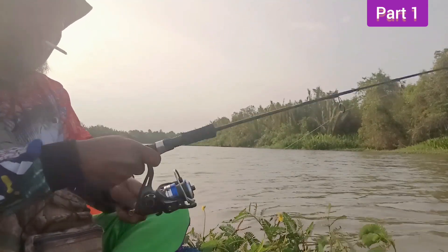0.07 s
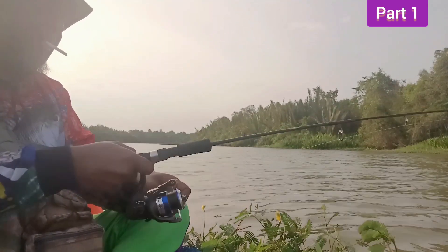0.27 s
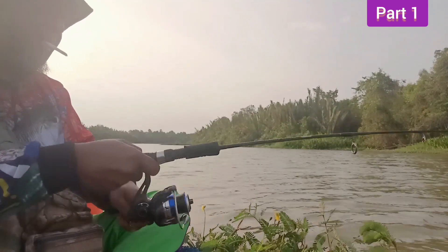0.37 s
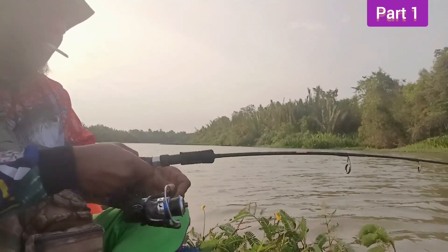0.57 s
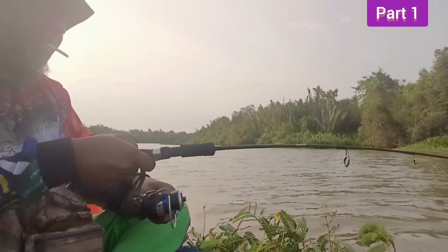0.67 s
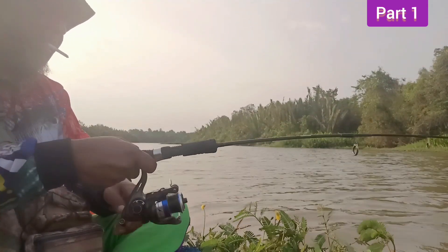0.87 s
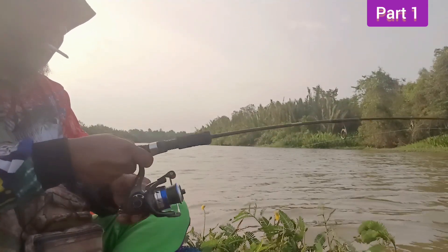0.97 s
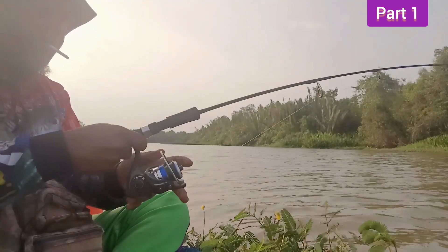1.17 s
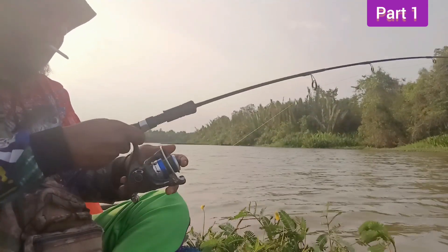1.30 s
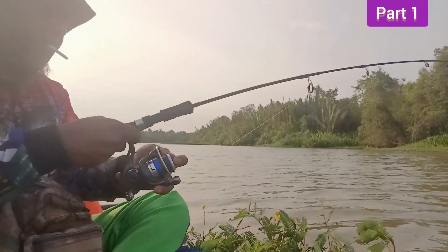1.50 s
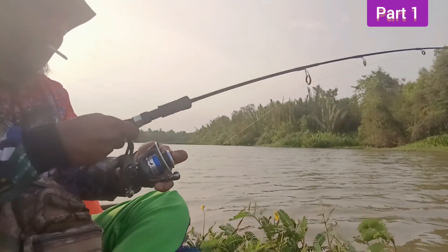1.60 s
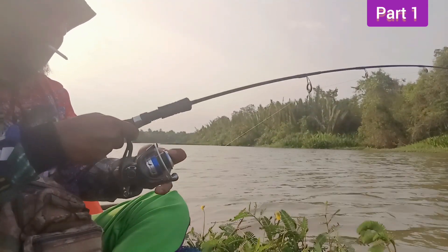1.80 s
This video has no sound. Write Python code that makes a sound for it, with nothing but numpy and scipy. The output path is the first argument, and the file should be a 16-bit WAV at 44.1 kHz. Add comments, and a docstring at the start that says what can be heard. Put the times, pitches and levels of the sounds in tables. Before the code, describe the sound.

A fishing reel's drag clicks rapidly with a bright metallic ring, over light wind.

```python
"""Spinning reel on a river bank

The rod dips and line is pulled off against the drag. The pawl ticks over its teeth, faster and
then slower, and sets the metal spool ringing. Later the reel gives a few dry ticks and the taut
line slips once. Wind buffets the two microphone ports, water laps at the bank, and air hisses."""
import sys
import numpy as np
from scipy import signal
from scipy.fft import rfft, irfft, next_fast_len
from scipy.io import wavfile
from scipy.ndimage import uniform_filter1d

SR = 44100
rng = np.random.default_rng(int(sys.argv[2]) if len(sys.argv) > 2 else 0)


def dump_mix(stems):
    """Bounce the given channels to the path in sys.argv[1] as a 16-bit WAV at rate SR."""
    frames = np.atleast_2d(stems).T  # one column per channel
    limited = np.clip(frames, -1, 1)  # hard clip at full scale
    pcm = np.round(limited * 32767).astype(np.int16)
    wavfile.write(sys.argv[1], SR, pcm)


N = 81585
T = np.arange(N) / SR

# Hiss of air over the river at each port. Each row: frequency in Hz, relative level in dB.
AIR_EQ_LEFT = [(300, 4.5), (600, -2), (1000, -8.5), (1900, 1), (3000, -9.5), (5000, -18), (7000, -27),
               (10200, -10.5), (12600, -23.5)]
AIR_EQ_RIGHT = [(300, 0), (600, -3.5), (1000, -7.5), (1900, 0.5), (3000, -8.5), (6900, -6), (8500, -16),
                (11000, -35.5), (13000, -15.5)]
# Puffs of wind. Each row: centre in seconds, strength in dB, half width in seconds,
# lean to the left in dB.
WIND_PUFFS = [(0.076, -32.5, 0.012, -20), (0.165, -29.5, 0.0086, 35), (0.23, -25, 0.016, 19),
              (0.316, -32.5, 0.043, -2.5), (0.483, -25.5, 0.026, -4.5), (0.532, -17, 0.0075, -7.5),
              (0.592, -15.5, 0.014, 5.5), (0.638, -20, 0.028, 0), (0.723, -26.5, 0.016, 8.5),
              (0.798, -35.5, 0.019, 13), (0.944, -36, 0.023, 20), (1.107, -32, 0.014, -23),
              (1.217, -31, 0.0028, 12), (1.391, -20.5, 0.016, -12.5), (1.472, -22.5, 0.042, -7.5),
              (1.544, -21.5, 0.025, 3), (1.64, -35.5, 0.028, 1), (1.784, -30.5, 0.035, 4)]
# The wind's deep and higher layers. Each row: frequency in Hz, relative level in dB.
RUMBLE_EQ = [(15, -27), (30, 2), (55, 9), (100, 4.5), (160, -15), (250, -35.5), (1500, -72.5)]
BUFFET_EQ = [(30, -18), (80, -0.5), (140, 5.5), (200, -4), (300, -22), (450, -37.5), (1500, -57.5)]
# The pawl drops off a tooth. Each row: start in seconds, tick level in dB, main tone level in dB,
# extra treble in dB.
PAWL_STRIKES = [(0.201, -23.5, -13, -2.5), (0.272, -23.5, -16, 0), (0.3112, -23, -14.5, -4),
                (0.342, -23, -8.5, -6), (0.3636, -23, -13, -14), (0.3814, -23.5, -17.5, -2.5),
                (0.3957, -25.5, -15.5, -3), (0.4071, -25, -8.5, 0), (0.417, -20.5, -13, -4),
                (0.4301, -21.5, -19, -6), (0.4418, -22, -23, -1), (0.4569, -26, -10.5, 1.5),
                (0.4762, -24, -16.5, -3), (0.4971, -23.5, -12.5, -5), (0.5158, -25, -22, 2),
                (0.537, -25, -22.5, 1), (0.559, -25, -14, -3), (0.5806, -23, -12.5, 2),
                (0.601, -22, -13, 0.5), (.6145, -26.5, -18, 0.5), (0.6295, -24.5, -16, -1.5),
                (0.6513, -26.5, -27.5, 2), (0.691, -26.5, -10.5, -3)]
# Modes of the reel's body (lowest) and of the spool, in close beating groups. Each row: pitch in Hz,
# relative level in dB, time to fall 60 dB in seconds, left over right in dB.
SPOOL_MODES = [(1490, -16, .05, 0), (4698, -16, .58, -11), (4722, -17.5, .4, -11), (6760, -2, .13, -28),
               (6866, -.5, .48, -28), (6881, -4, .44, -26), (6895, -7, .22, -28), (6973, 0, .14, -28),
               (11090, -24, .22, 12), (11607, -19, .19, 8), (11655, -21, .14, 8)]
# Colour of a drag tick at each port. Each row: frequency in Hz, relative level in dB.
DRAG_EQ_LEFT = [(950, -15), (1450, 0), (2000, -14.5), (3200, -18), (5000, -3.5), (7800, -32), (8600, -13),
                (9450, 6), (9950, 1), (10400, 4.5), (11200, -8), (12500, 4.5), (13500, -15), (15200, 1.5)]
DRAG_EQ_RIGHT = [(950, -14), (1500, 1), (2000, -13.5), (3100, -8.5), (3800, -17), (5800, -1), (7000, 8.5),
                 (8200, -25), (10800, -45.5), (11900, 0), (13400, -14), (14400, 8.5), (15250, 7),
                 (15700, -13)]
# Plops at the bank. Each row: start in seconds, starting pitch in Hz, level in dB,
# time to fall 60 dB in seconds.
WATER_PLOPS = [(.689, 807, -41, 0.072), (0.771, 1310, -34.5, 0.017), (1.019, 1284, -43, 0.048),
               (1.686, 1535, -36, 0.015), (1.700, 693, -43, 0.12), (1.733, 1330, -32, 0.019),
               (1.807, 845, -39.5, 0.07)]
# Colour of a splash. Each row: frequency in Hz, relative level in dB.
SPLASH_EQ = [(200, 1), (550, 7.5), (900, 0), (1400, 6), (2400, 2), (3300, -17.5), (10000, -44)]
# Dry ticks of the reel's mechanism. Each row: start in seconds, relative level in dB.
MECHANISM_TICKS = [(0.7708, -35.5), (0.811, -44.5), (1.293, -40.5), (1.3767, -32), (1.4306, -33.5),
                   (1.470, -33.5), (1.511, -34.5), (1.553, -42.5), (1.638, -44.5)]
# Their colour at each port. Each row: frequency in Hz, relative level in dB.
DRY_EQ_LEFT = [(600, -12), (2600, -13), (3200, 3.5), (4200, -13), (6800, -21), (8800, -7), (9600, 6),
               (10700, -15), (12900, 3), (14300, -33)]
DRY_EQ_RIGHT = [(600, -29), (2600, -3), (3200, 2.5), (4000, -10), (6300, -8.5), (6800, 7.5), (8000, -7.5),
                (10500, -36), (13000, -4), (15100, -20)]
# Colour of the line's slip. Each row: frequency in Hz, relative level in dB.
SLIP_EQ = [(3500, -20), (5100, 4), (7500, -12), (9500, -26)]


def from_db(db):
    """Decibels to gain."""
    return 10 ** (np.asarray(db) / 20)


def pan(db):
    """Constant-power left and right gains, with the left louder by db."""
    gains = np.array([np.atleast_1d(from_db(db / 2)), np.atleast_1d(from_db(-db / 2))])
    return gains / np.sqrt(np.mean(gains ** 2, axis=0))


def colour(x, eq):
    """Minimum-phase EQ of unit power gain: nothing rings ahead of an attack."""
    size = next_fast_len(2 * N)
    hz, db = np.transpose(eq)
    bin_hz = np.arange(size // 2 + 1) * SR / size
    gain = from_db(np.interp(np.log(bin_hz + 1), np.log(hz), db))
    gain /= np.sqrt(np.mean(gain ** 2))
    cepstrum = irfft(np.log(gain), size)
    cepstrum[1:size // 2] *= 2
    cepstrum[size // 2 + 1:] = 0
    return irfft(rfft(x, size) * np.exp(rfft(cepstrum)), size)[..., :N]


def port_noise(envelope, left_eq, right_eq, shared=.4):
    """Partly shared stereo noise under an envelope, coloured for each microphone port."""
    common, *own = rng.standard_normal((3, N))
    left, right = envelope * (np.sqrt(shared) * common + np.sqrt(1 - shared) * np.array(own))
    return np.array([colour(left, left_eq), colour(right, right_eq)])


def decay(start, t60):
    """An envelope that jumps to 1, then falls 60 dB every t60 seconds."""
    return (T >= start) * from_db(-60 * np.maximum(T - start, 0) / t60)


def rise(start, seconds):
    """An attack that eases from 0 towards 1."""
    return 1 - np.exp(-np.maximum(T - start, 0) / seconds)


def river_air():
    """A wide bed of hiss from the air over the river, slowly easing."""
    fade_db_per_s = 2.5
    return port_noise(from_db(-50.5 - fade_db_per_s * T), AIR_EQ_LEFT, AIR_EQ_RIGHT, shared=.16)


def eddies(eq):
    """Low turbulence, separate at each port, with its slow swings evened out."""
    noise = colour(rng.standard_normal((2, N)), eq)
    return noise / np.sqrt(uniform_filter1d(noise ** 2, size=900, axis=-1) + 1e-6)


def wind():
    """Puffs over a light breeze: a deep rumble, and a higher buffeting that swells more steeply."""
    breeze_db, reference_db = -56, -28
    puff_power = sum((pan(pan_db) * from_db(db)) ** 2 * np.exp(-((T - centre) / width) ** 2)
                     for centre, db, width, pan_db in WIND_PUFFS)
    gust = np.sqrt(from_db(breeze_db) ** 2 + puff_power) / from_db(reference_db)
    rumble = from_db(-28.5) * gust ** .75 * eddies(RUMBLE_EQ)
    buffet = from_db(-34) * gust ** 1.416 * eddies(BUFFET_EQ)
    return rumble + buffet


def pawl_snap(start, t60):
    """Envelope of one snap: quick attack, brief hold, decay."""
    hold_s = .0025
    return rise(start, seconds=.0013) * from_db(-60 * np.maximum(T - start - hold_s, 0) / t60)


def drag_ticks():
    """Each pawl snap is a crack, plus a rattle in the body that thickens as the spool speeds up."""
    rattle_db_per_doubling, treble_split_hz = 7, 13000
    starts, tick_db, _, treble_db = np.transpose(PAWL_STRIKES)
    rate = 1 / np.gradient(starts)
    rattles = from_db(-16 + rattle_db_per_doubling * np.log2(rate / np.median(rate)))
    powers = np.array([pawl_snap(start, t60=.018) ** 2 + (rattle * pawl_snap(start, t60=.085)) ** 2
                       for start, rattle in zip(starts, rattles)])
    ticks = 0
    # Two bands give each tick its own brightness.
    for band, db in (("low", tick_db), ("high", tick_db + treble_db)):
        envelope = np.sqrt(from_db(db) ** 2 @ powers)
        crossover = signal.butter(10, treble_split_hz, band, fs=SR, output="sos")
        ticks += signal.sosfilt(crossover, port_noise(envelope, DRAG_EQ_LEFT, DRAG_EQ_RIGHT))
    return from_db(1) * ticks


def spool_ring():
    """Each strike rings the spool. The next chokes its main tone; the rest pile up and shimmer."""
    bloom_s = .011  # the beating modes come roughly into step this long after a strike
    spread_db, scatter_turns = .8, .1
    ring = np.zeros((2, N))
    next_starts = [row[0] for row in PAWL_STRIKES[1:]] + [N / SR]
    for (start, tick_db, main_db, _), next_start in zip(PAWL_STRIKES, next_starts):
        attack = rise(start, seconds=.0028)
        choked = from_db(main_db) * attack * (1 - rise(next_start, seconds=.002))
        free = from_db(tick_db) * attack
        strike_phase = rng.random()
        for hz, db, t60, pan_db in SPOOL_MODES:
            span = slice(int(start * SR), int((start + t60) * SR))
            age = T[span] - start
            envelope = choked if 6800 < hz < 6950 else free  # this band is the main tone
            strength = from_db(db + spread_db * rng.standard_normal())
            phase = strike_phase + scatter_turns * rng.standard_normal()
            mode = from_db(-60 * age / t60) * np.sin(2 * np.pi * (hz * (age - bloom_s) + phase))
            ring[:, span] += pan(pan_db) * strength * envelope[span] * mode
    return from_db(-1.3) * ring


def water():
    """Each plop is a bubble gliding up in pitch, with a small splash."""
    glide_per_s = 6  # in multiples of the starting pitch
    bubbles, splash_envelope = 0, 0
    for start, hz, db, t60 in WATER_PLOPS:
        age = np.maximum(T - start, 0)
        attack = from_db(db) * rise(start, seconds=.0015)
        chirp = np.sin(2 * np.pi * hz * (age + glide_per_s * age ** 2 / 2))
        bubbles += attack * decay(start, t60) * chirp
        splash_envelope += attack * decay(start, t60=.12)
    return bubbles + from_db(-8) * port_noise(splash_envelope, SPLASH_EQ, SPLASH_EQ)


def dry_ticks():
    """Light ticks of the mechanism that do not ring the spool."""
    envelope = sum(from_db(db) * decay(start, t60=.02) for start, db in MECHANISM_TICKS)
    return from_db(-1.5) * port_noise(envelope, DRY_EQ_LEFT, DRY_EQ_RIGHT)


def line_slip():
    """The taut line shifts on the spool with one small, sharp tick."""
    return from_db(-42) * port_noise(decay(start=1.0245, t60=.021), SLIP_EQ, SLIP_EQ)


def scene():
    """The reel close by on the right, with water, wind and open air around it."""
    left_lag_s = .00043  # the reel is nearer the right port
    left, right = spool_ring() + drag_ticks() + dry_ticks() + line_slip()
    reel = np.array([np.interp(T - left_lag_s, T, left), right])
    return reel + water() + wind() + river_air()


def record(dry):
    """A steep low-pass takes the very top off the mix."""
    cutoff_hz = 15750
    return signal.sosfilt(signal.ellip(10, .1, 80, cutoff_hz, fs=SR, output="sos"), dry)


dry = scene()
out = record(dry)
dump_mix(out)
```